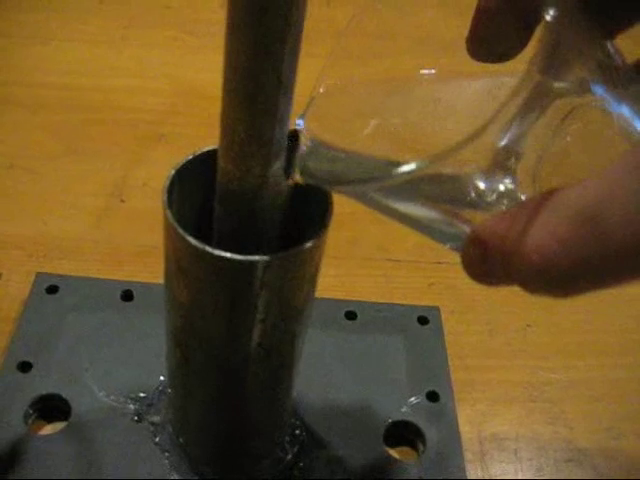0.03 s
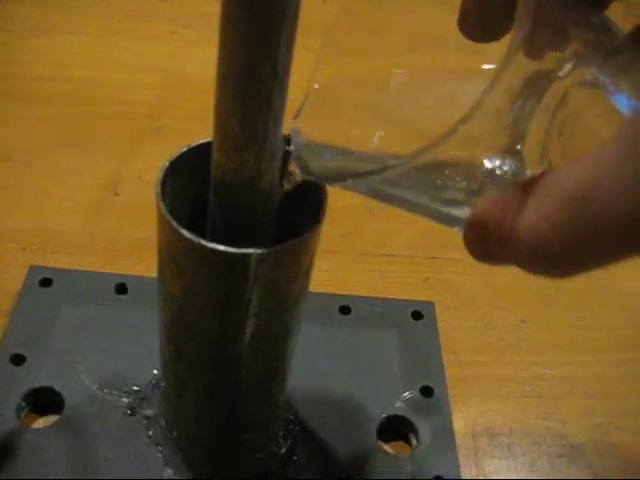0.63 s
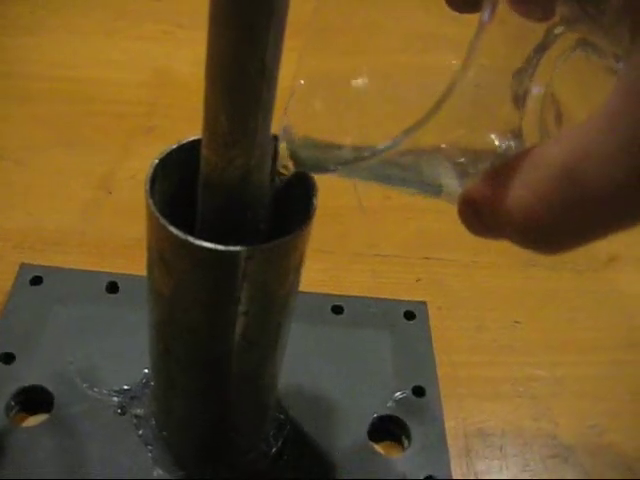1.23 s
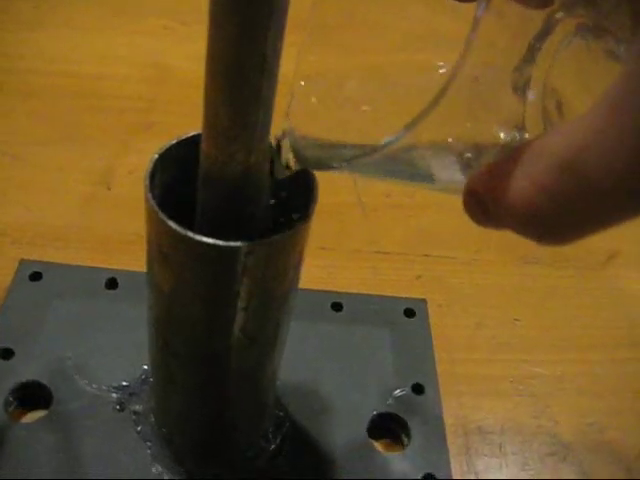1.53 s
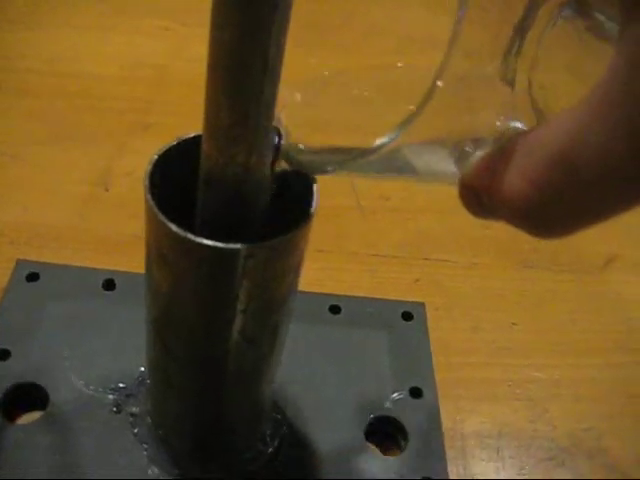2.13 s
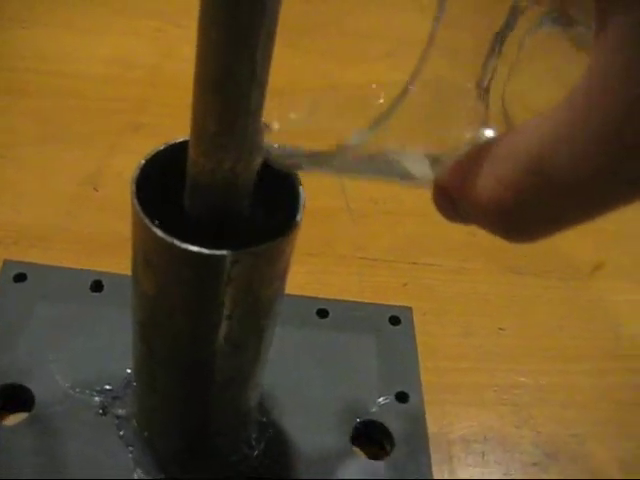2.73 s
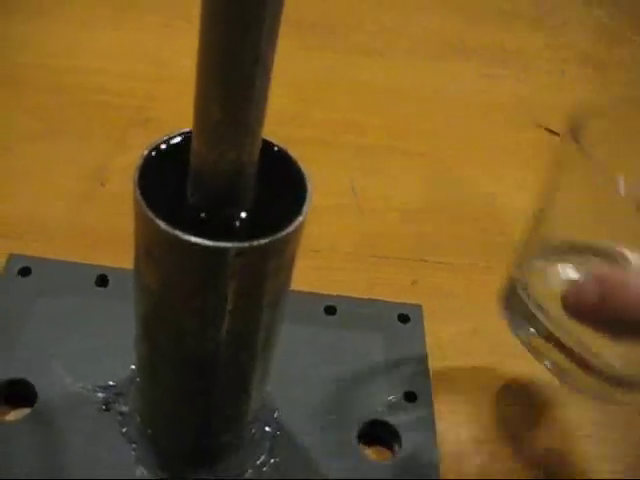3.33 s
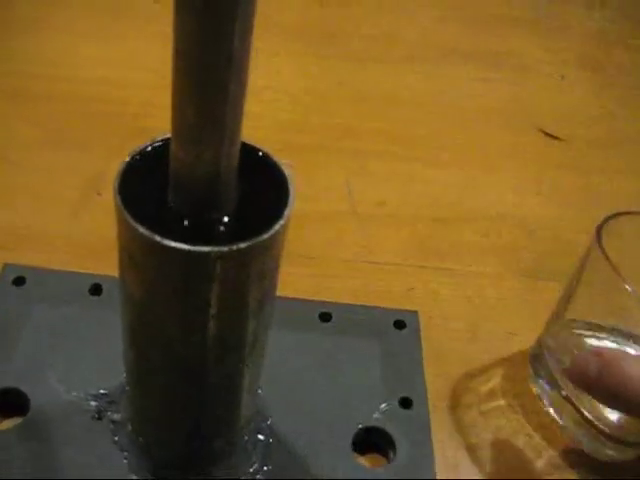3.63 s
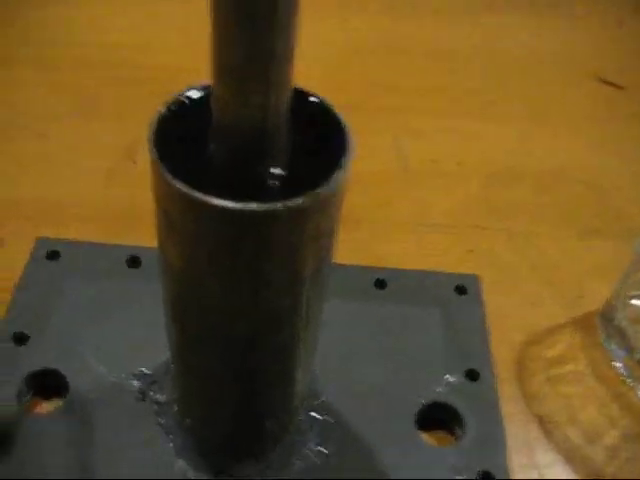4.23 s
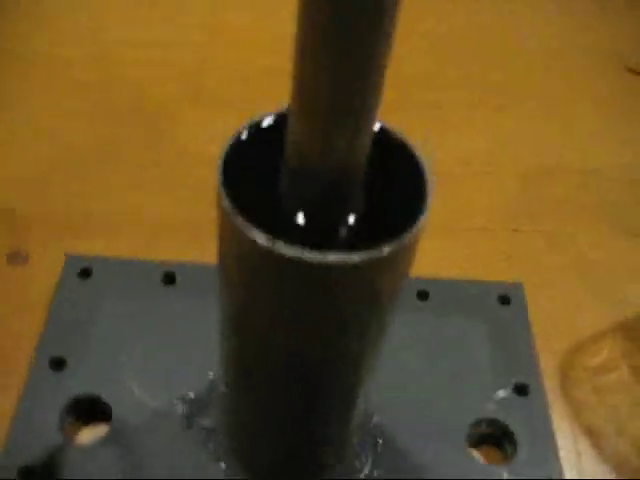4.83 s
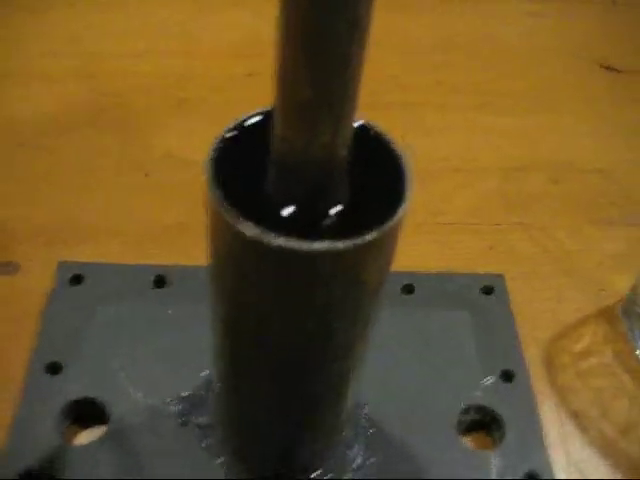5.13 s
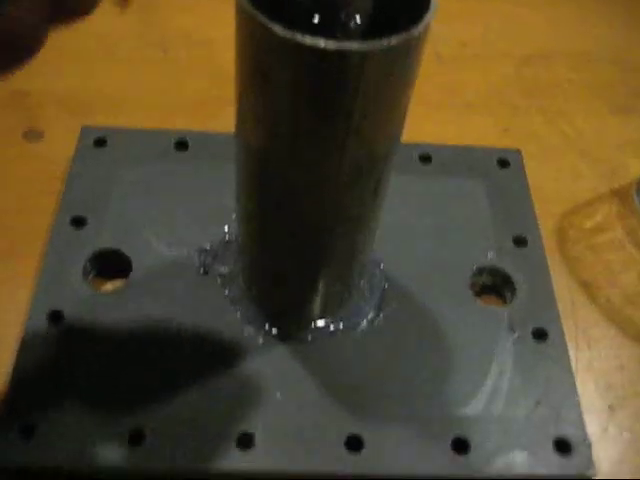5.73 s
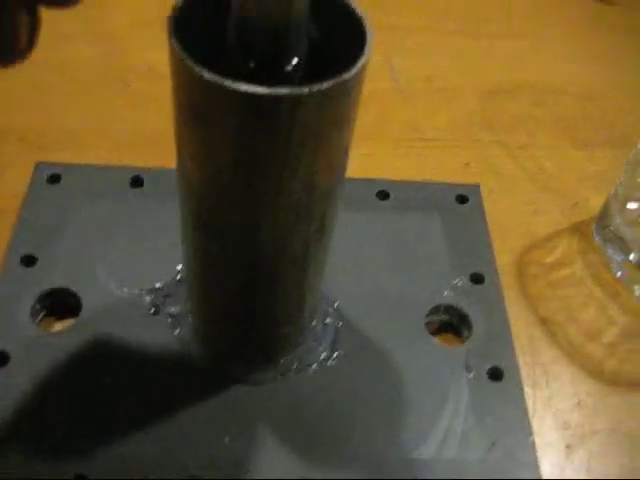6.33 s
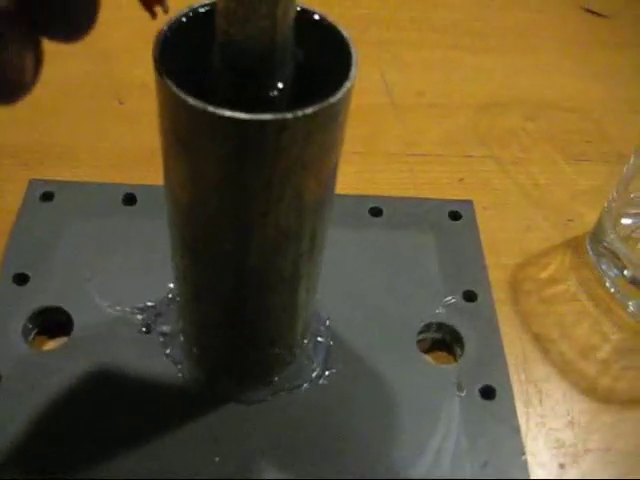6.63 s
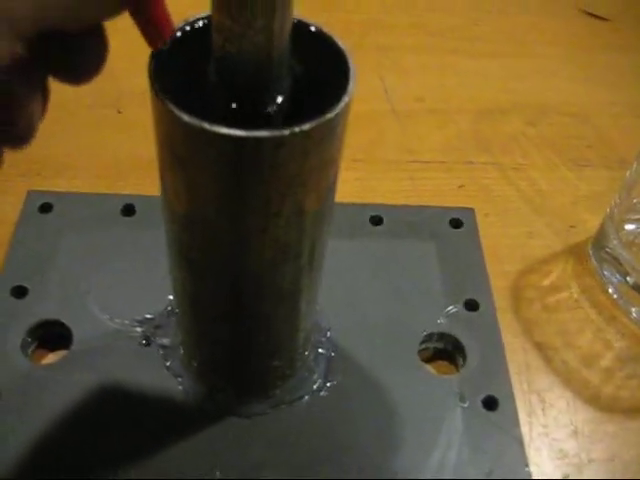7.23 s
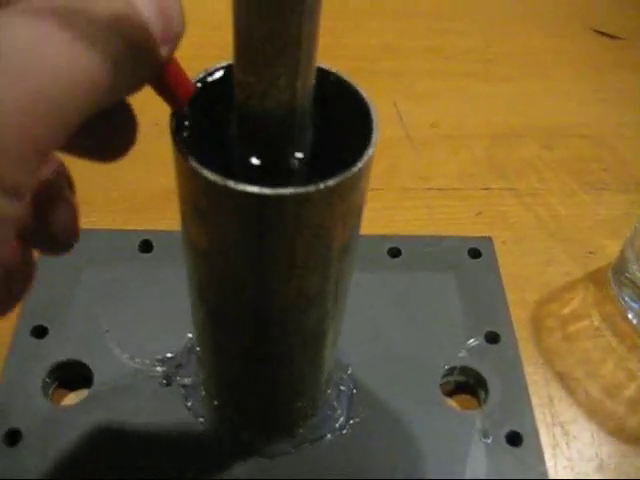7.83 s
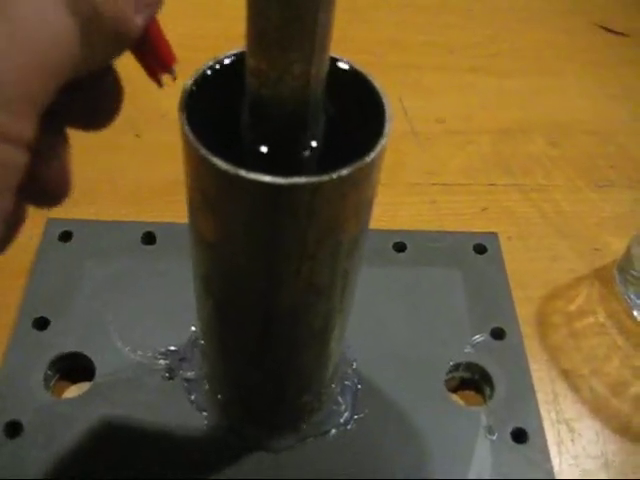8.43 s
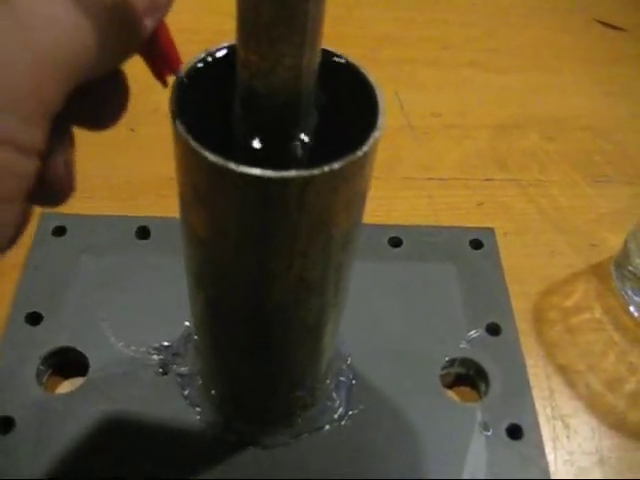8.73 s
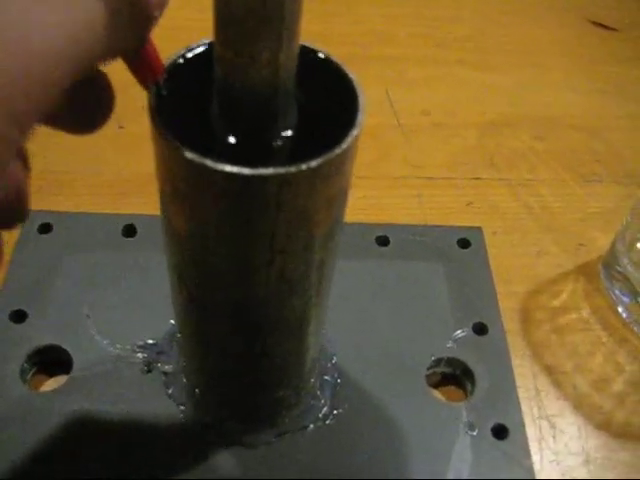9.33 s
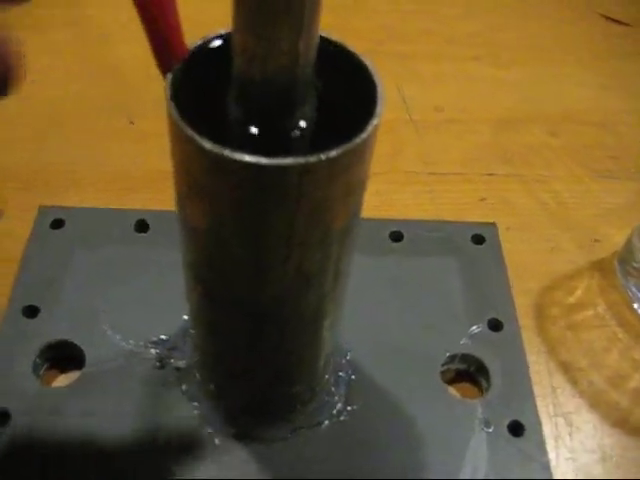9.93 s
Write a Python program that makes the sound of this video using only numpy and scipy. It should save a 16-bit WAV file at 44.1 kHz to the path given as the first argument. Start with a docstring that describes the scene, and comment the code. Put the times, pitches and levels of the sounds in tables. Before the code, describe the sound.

A drinking glass touches a steel tube softly twice, gives one short, damped clink and then knocks down onto a wooden tabletop. Close, gritty rubbing and clicks follow as the grip shifts on the handheld microphone, leaving a low rumble. Scattered small metallic taps come from a clip against the tube, then a dull thump. Coarse hiss, hum, a thin whine and a distant clock fill the small room throughout.

```python
"""Over a small room's hum and ticking clock come two light taps, then a drinking glass clinks on the rim
of a steel tube and is set down on a wooden table. Fingers shift their grip on the camera, scraping and
bumping its case; then a clip lead taps lightly at the tube. The camera whines faintly, turns its gain
down after loud sounds and stores its sound coarsely, as held 8-bit samples."""
import sys
import numpy as np
from scipy import signal
from scipy.fft import rfft, irfft, next_fast_len
from scipy.io import wavfile
from scipy.ndimage import map_coordinates

SR = 44100
rng = np.random.default_rng(int(sys.argv[2]) if len(sys.argv) > 2 else 0)


def dump_mix(stems):
    """Bounce the given channels to the path in sys.argv[1] as a 16-bit WAV at rate SR."""
    frames = np.atleast_2d(stems).T  # one column per channel
    limited = np.clip(frames, -1, 1)  # hard clip at full scale
    pcm = np.round(limited * 32767).astype(np.int16)
    wavfile.write(sys.argv[1], SR, pcm)


N = 440118
TIME = np.arange(N) / SR
AGE = np.arange(SR // 2) / SR  # seconds since a hit


def clink():
    """The glass rim knocks the tube and rebounds once; a harder touch wakes the upper modes."""
    # rim on tube: (time [s], level [dB], hardness [dB])
    knocks = [(2.8712, -4, -6.5), (2.8739, -24.5, 7)]
    # glass against steel, damped by the hand: (frequency [Hz], level [dB], t60 [s])
    body_modes = [(227, -24, 0.064), (870, -4.5, 0.043), (962, -3, 0.028), (1130, -5.5, .025)]
    # the rim's upper modes: (frequency [Hz], level [dB], t60 [s])
    rim_modes = [(1610, -10, 0.03), (1995, -21, 0.07), (2296, -15, 0.073), (2920, -0.5, 0.0092),
                 (3850, -12, 0.054)]
    out = np.zeros(N)
    for s, db, hard_db in knocks:
        body = ring(body_modes, attack=0.00064)
        sparkle = amp(hard_db) * ring(rim_modes, attack=0.00078)
        add(out, s, amp(db) * (body + sparkle))
    return room(out, wet_db=-23, build=0.0051)


def set_down():
    """The thick glass base drives the table top, which fills the room."""
    # the glass lands and settles: (time [s], wood level [dB], crack level [dB])
    landings = [(3.7219, -7, -14), (3.861, -41, -22), (3.878, -52, -27.5)]
    # the table sways on its legs and its top rings: (frequency [Hz], level [dB], t60 [s])
    table_modes = [(41.8, -34.5, 3.5), (138, -18.5, 0.088), (248, -6.5, 0.11), (411, -4, 0.075),
                   (539, 0.5, 0.029), (624, 2, 0.031), (769, 8, 0.017), (867, -6, 0.033), (1022, -1, 0.024),
                   (1162, -9.5, .04), (1430, -14.5, 0.024), (1870, -16.5, 0.023), (2530, -12.5, 0.011)]
    # crack of glass on wood: (frequency [Hz], density [dB])
    crack_spectrum = [(200, -13), (900, 3), (1800, 3), (2700, 3.5), (4200, -4.5), (5400, -10), (6500, -60)]
    wood, crack = np.zeros((2, N))
    for s, db, crack_db in landings:
        add(wood, s, amp(db) * ring(table_modes, attack=0.00022))
        add(crack, s, amp(crack_db) * fade(t60=0.018))
    return room(wood + crack * noise(crack_spectrum), wet_db=-10, build=0.03)


def taps(first_flight_s=0.0235, flight_ratio=0.6, bounce_loss_db=12):
    """The lead taps the tube: a bright tick and a short ring, then two ever quicker, weaker rebounds."""
    # light taps: (time [s], level [dB], ring pitch [Hz], tick offset [dB])
    touches = [(0.729, -30.5, 679, -5), (1.558, -29.5, 750, -19), (5.514, -33, 1016, -0.5),
               (7.124, -39.5, 894, 6), (7.6945, -19, 818, -9), (8.878, -37, 1160, 14),
               (9.1793, -40.5, 940, 16), (9.518, -19, 1076, -7), (9.732, -31.5, 760, -11)]
    # the tube on its base plate, pitched by where it is touched: (pitch [ratio], level [dB], t60 [s])
    tube_modes = [(0.332, -8, 0.071), (0.779, -12, 0.04), (0.999, 1.5, 0.03), (1.218, -3, 0.027),
                  (2.03, -7, 0.018)]
    # contact tick: (frequency [Hz], density [dB])
    tick_spectrum = [(200, -13), (1000, -9.5), (2000, -9.5), (2900, 1.5), (4200, -7), (5400, -14),
                     (6500, -60)]
    rings, ticks = np.zeros((2, N))
    for s, db, hz, tick_db in touches:
        modes = [(hz * ratio, level, t60) for ratio, level, t60 in tube_modes]
        for bounce in range(3):
            hit_db = db - bounce * bounce_loss_db
            add(rings, s, amp(hit_db - 2) * ring(modes, attack=0.00057))
            add(ticks, s, amp(hit_db + tick_db) * fade(t60=0.017))
            s += first_flight_s * flight_ratio ** bounce
    return room(rings + ticks * noise(tick_spectrum), wet_db=-14, build=0.0042)


def grip():
    """Skin scrapes over the camera case in gritty strokes and now and then snaps free, close and dry."""
    # fingers slide: (start [s], length [s], rub level [dB], scrape over the rub [dB])
    strokes = [(4.265, 0.1, -30.5, -2), (4.384, .04, -32, -9), (4.466, .11, -33.5, 4.5),
               (4.56, 0.069, -28.5, 8), (4.624, 0.17, -23, 4), (4.775, 0.078, -24, 0.5),
               (4.846, 0.14, -38.5, -1), (5.28, .028, -39.5, -3), (5.912, .062, -35, -10),
               (6.014, .045, -34, -7), (6.393, 0.082, -31, -22), (7.586, 0.043, -39, -1.5),
               (7.902, .03, -39.5, -12), (9.888, 0.057, -38, -7)]
    # a finger catches and slips: (time [s], snap level [dB], thud level [dB], snap decay [s])
    slips = [(4.2669, -4.5, -9, 0.0023), (4.387, -8.5, -34, 0.0012), (4.415, -23, -34, 0.0018),
             (4.462, -27.5, -21, 0.003), (4.817, -15, -30, .004), (4.8242, 0, -16, 0.0013)]
    # thud of the case: (frequency [Hz], level [dB], t60 [s])
    case_modes = [(82, -31, 0.092), (237, -13, 0.06), (372, -10, .025), (497, -0.5, 0.017),
                  (736, -5, 0.021), (1030, -13, .012)]
    # skin on plastic, as coarse scrape, fine rub and snap: (frequency [Hz], density [dB])
    scrape_spectrum = [(24, -19), (40, 7), (70, -9.5), (275, -5), (442, -7), (666, -6.5), (784, 1),
                       (1280, -6.5), (1610, -2.5), (1900, -9.5), (2230, -6.5), (2530, -11.5), (3810, -4),
                       (5400, -9.5), (7020, -48), (11900, -120)]
    rub_spectrum = [(100, -30), (600, -10.5), (850, -1), (1050, -3.5), (1280, 3), (1800, -13.5),
                    (2300, -0.5), (2650, -3), (3050, 1.5), (3450, 0), (4000, -11.5), (4600, -10.5),
                    (5400, -14)]
    snap_spectrum = [(100, -47.5), (700, -8.5), (1500, -0.5), (2100, -2), (2700, -8.5), (3200, -7.5),
                     (4200, -11.5), (5400, -12.5), (6500, -45)]
    coarse, fine, snaps, thuds = np.zeros((4, N))
    for start, length, rub_db, scrape_db in strokes:
        pressure = np.abs(np.sin(np.pi * AGE[AGE < length] / length)) ** 0.95  # one arch a stroke
        add(fine, start, amp(rub_db) * pressure)
        add(coarse, start, amp(rub_db + scrape_db) * pressure)
    lead_s = 0.05  # space for a snap to swell before its peak
    for s, snap_db, thud_db, decay_s in slips + judder():
        from_peak = (AGE - lead_s) / decay_s
        spike = np.exp(np.minimum(2 * from_peak, -from_peak))
        add(snaps, s - lead_s, amp(snap_db) * spike)
        add(thuds, s, amp(thud_db) * ring(case_modes))
    flutter = amp(1.3 * wobble(70))
    scrape = coarse * noise(scrape_spectrum, grit_db=2)
    rub = fine * noise(rub_spectrum, grit_db=1)
    return flutter * (scrape + rub) + snaps * noise(snap_spectrum, grit_db=1) + thuds


def judder(start_s=4.5785, gap_s=0.0056, count=5, snap_db=-14.5, thud_db=-11, decay_s=0.0015):
    """Under the hardest press the finger sticks and slips in a quick, slightly uneven run."""
    times = start_s + gap_s * (np.arange(count) + 0.097 * rng.standard_normal(count))
    return [(s, snap_db, thud_db, decay_s) for s in times]


def bumps(cycles=3, cutoff_hz=1300):
    """A soft push swings the case out and back, barely ringing."""
    # pushes on the camera: (time [s], level [dB], frequency [Hz])
    pushes = [(4.463, -23, 75), (4.727, -14.5, 44.8), (9.899, -16, 175), (9.958, 5, 416)]
    out = np.zeros(N)
    for s, db, hz in pushes:
        add(out, s, -amp(db) * fade(t60=cycles / hz) * np.sin(2 * np.pi * hz * AGE))
    return filtered(out, lambda hz: 1 / (1 + (hz / cutoff_hz) ** 4))


def hand_tremor():
    """The holding hand rumbles, growing restless once the grip has shifted."""
    # tremor envelope: (time [s], level [dB])
    restlessness = [(2.5, -63), (3.1, -56), (4.2, -51), (4.95, -43), (8.3, -39.5), (9.97, -44)]
    # low rumble: (frequency [Hz], density [dB])
    spectrum = [(15, -12.5), (42, 1), (80, -2), (130, -6), (220, -12), (400, -25), (1000, -29.5),
                (3000, -32.5), (5400, -37.5), (6500, -86)]
    level_db = np.interp(TIME, *np.transpose(restlessness))
    return amp(level_db + 1.5 * wobble(9)) * noise(spectrum)


def clock(first_s=0.167, blur_s=0.02):
    """A clock across the room ticks each second, smeared by the walls."""
    # colour of the clock's case: (frequency [Hz], density [dB])
    spectrum = [(200, -22), (690, -8.5), (785, 5.5), (880, -9.5), (1230, -13), (1355, 2), (1500, -14),
                (1900, -15), (2250, -7.5), (2800, -15.5), (3700, -10), (5400, -20.5), (6500, -60)]
    swell = np.zeros(N)
    for s in first_s + np.arange(10):
        add(swell, s, fade(t60=0.23) * (1 - np.exp(-AGE / blur_s)) ** 2)
    return amp(16) * swell * noise(spectrum)


def room_hum():
    """A low hum whose partials each waver in level and phase."""
    # hum partials: (frequency [Hz], level over the hiss [dB], unsteadiness [0-1])
    partials = [(119.93, 1.5, .08), (288.4, -3, .2), (360.8, -16, .08), (720.7, -16, .1), (839, -12, .25)]
    out = np.zeros(N)
    for hz, db, unsteadiness in partials:
        waver = 1 + unsteadiness * (wobble(14) + 1j * wobble(14))
        out += amp(db) * unit(np.real(waver * np.exp(2j * np.pi * hz * TIME)))
    return out


def camera_whine(frame_s=1 / 30):
    """A thin whine slips in phase and resets with every picture frame, which gives it a slight buzz."""
    # whine partials: (frequency [Hz], level over the hiss [dB], detune within a frame [Hz])
    partials = [(2775, -5.5, -10.5), (3179, -8, -15)]
    in_frame = TIME % frame_s
    return sum(amp(db) * unit(np.sin(2 * np.pi * (hz * TIME + detune * in_frame)))
               for hz, db, detune in partials)


def faint_tone(hz=1082, db=-60, start_s=-0.3, end_s=4.1, fade_s=0.8):
    """A faint pure tone comes and goes."""
    presence = np.clip(np.minimum(TIME - start_s, end_s - TIME) / fade_s, 0, 1)
    return amp(db) * presence * unit(np.sin(2 * np.pi * hz * TIME))


def hiss():
    """A steady, dull bed of noise."""
    # noise floor: (frequency [Hz], density [dB])
    spectrum = [(20, -8.5), (70, -2), (160, 2), (300, 4), (480, -1), (800, 0), (1200, -3), (2000, -5),
                (3000, -5), (4000, -6.5), (5400, -7.5), (6500, -68)]
    return noise(spectrum)


def room(x, wet_db, build):
    """Direct sound plus the walls' diffuse tail, which builds up with a time constant of build seconds."""
    # the small room's reverb: (frequency [Hz], t60 [s], colour [dB])
    bands = [(92, 0.34, -5), (402, 0.82, -2), (602, 0.54, -2), (1015, .5, 2), (1495, 0.67, 3),
             (2460, .33, -0.5), (5100, 0.28, -4)]
    hz, t, spectra = signal.stft(rng.standard_normal(SR * 3 // 4), SR, nperseg=256)
    t60 = along([(f, life) for f, life, _ in bands], hz)[:, None]
    colour_db = along([(f, db) for f, _, db in bands], hz)[:, None]
    envelope = amp(colour_db - 60 * t / t60) * (1 - np.exp(-t / build))
    _, tail = signal.istft(spectra * envelope, SR, nperseg=256)
    return x + amp(wet_db) * signal.fftconvolve(x, tail / np.linalg.norm(tail))[:N]


def auto_gain(x, knee_db=-27.5, memory_s=0.5, attack_s=0.012, recovery_db_per_s=4):
    """Loud sounds turn the camera's gain down; it creeps back at a steady rate."""
    level_db = 10 * np.log10(lagged(x ** 2, memory_s) + 1e-12)
    excess_db = np.maximum(level_db - knee_db, 0)
    recovery_db = recovery_db_per_s * TIME
    cut_db = np.maximum.accumulate(excess_db + recovery_db, axis=-1) - recovery_db
    return x * amp(-lagged(cut_db, attack_s))


def ring(modes, attack=0.00018):
    """Damped modes, struck at slightly new strengths each time; a soft contact starts them gradually."""
    tones = sum(amp(db + rng.standard_normal()) * fade(t60) * np.sin(2 * np.pi * hz * AGE)
                for hz, db, t60 in modes)
    return tones * (1 - np.exp(-AGE / attack))


def noise(spectrum, grit_db=0):
    """Coloured noise of rms 1; grit makes single 16-sample grains stand out."""
    grains = np.repeat(rng.standard_normal(N // 16 + 1), 16)[:N]
    white = rng.standard_normal(N) * amp(grit_db * grains)
    return unit(filtered(white, lambda hz: amp(along(spectrum, hz))))


def fade(t60):
    """Exponential decay, 60 dB in t60 seconds."""
    return amp(-60 * AGE / t60)


def wobble(rate):
    """A smooth random curve, rate knots a second."""
    coarse = TIME[::64]
    curve = map_coordinates(rng.standard_normal(1024), [coarse * rate], mode="wrap")
    return np.interp(TIME, coarse, curve)


def filtered(x, response):
    """Equalise x by a gain curve over frequency."""
    size = next_fast_len(N + SR // 2)
    return irfft(rfft(x, size) * response(np.fft.rfftfreq(size, 1 / SR)), size)[..., :N]


def lagged(x, seconds):
    """Smooth x with a time constant."""
    keep = np.exp(-1 / (seconds * SR))
    return signal.lfilter([1 - keep], [1, -keep], x)


def along(points, hz):
    """Interpolate (frequency, value) points on a log axis."""
    freqs, values = np.transpose(points)
    return np.interp(np.log(hz + 1), np.log(freqs + 1), values)


def add(track, s, sound):
    """Mix a sound into a track at time s."""
    part = track[round(s * SR):][:len(sound)]
    part += sound[:len(part)]


def amp(db):
    """Decibels to gain."""
    return 10 ** (np.asarray(db) / 20)


def unit(x):
    """Scale to rms 1."""
    return x / np.sqrt(np.mean(x ** 2) + 1e-20)


def scene():
    """All sources at the one microphone."""
    foreground = clink() + set_down() + taps() + grip() + bumps()
    hum = room_hum()
    rumble = hand_tremor()
    bed = amp(-47) * (hiss() + hum + camera_whine() + clock())
    return (foreground + rumble + bed + faint_tone())[None]


def record(dry):
    """Automatic gain, then slow 8-bit sampling: holding each sample mirrors the sound into the treble."""
    hold, steps, top_hz = 4, 128, 15750  # samples per held value, steps per polarity, band limit
    nyquist_hz = SR / (2 * hold)
    slow = filtered(auto_gain(dry), lambda hz: 1 / (1 + (hz / nyquist_hz) ** 40))[:, ::hold]
    crushed = np.round(np.clip(slow, -1, 1) * steps) / steps
    held = np.repeat(crushed, hold, axis=1)[:, :N]
    return filtered(held, lambda hz: hz < top_hz)


dry = scene()
out = record(dry)
dump_mix(out)
```